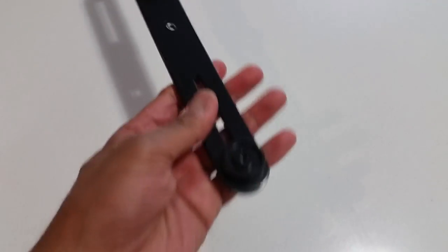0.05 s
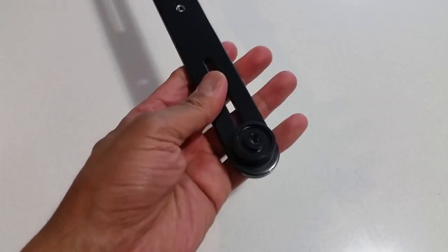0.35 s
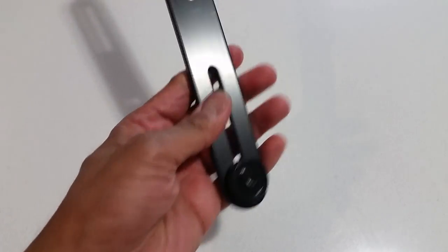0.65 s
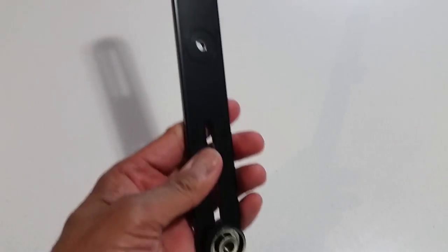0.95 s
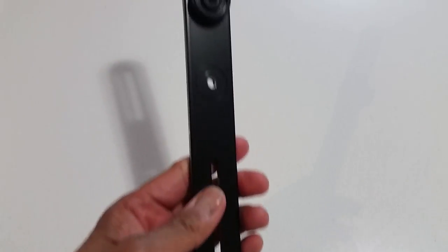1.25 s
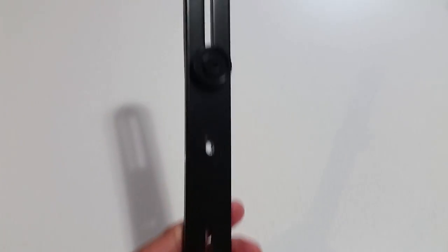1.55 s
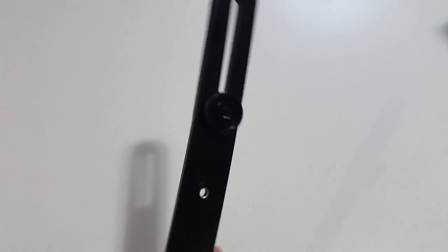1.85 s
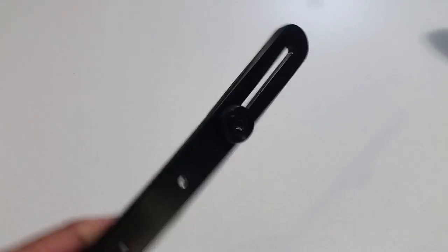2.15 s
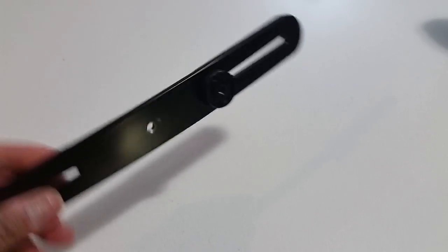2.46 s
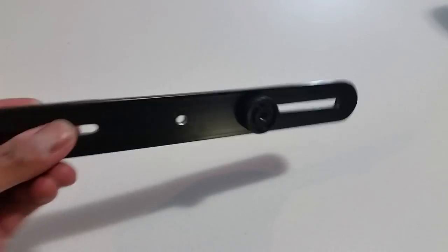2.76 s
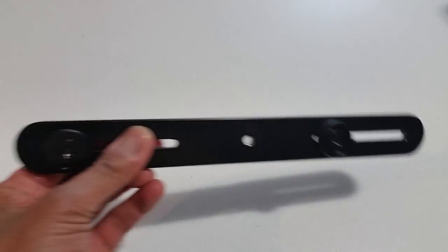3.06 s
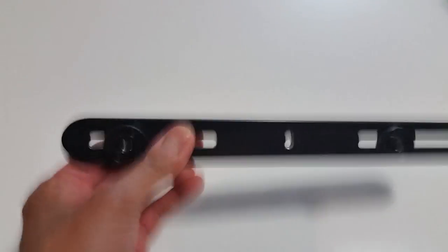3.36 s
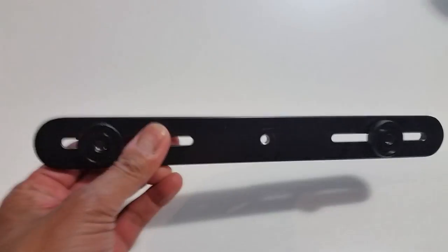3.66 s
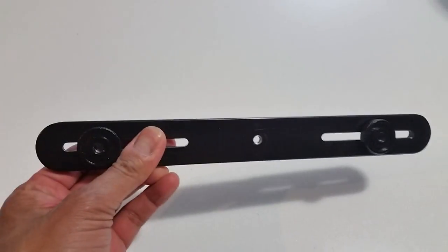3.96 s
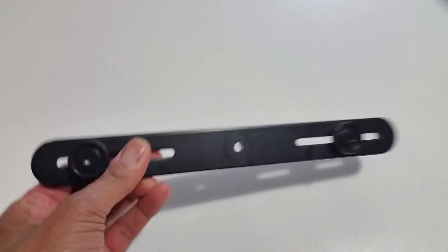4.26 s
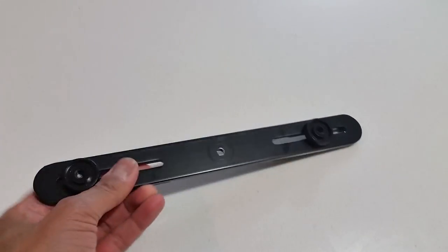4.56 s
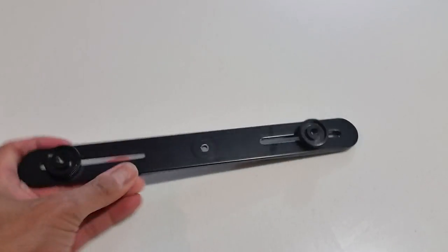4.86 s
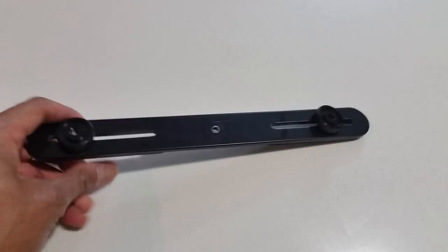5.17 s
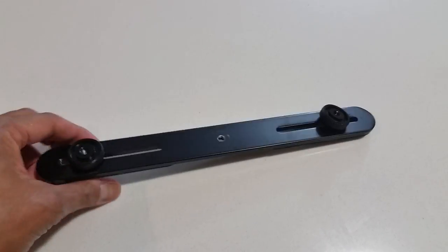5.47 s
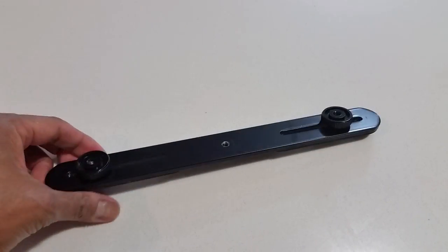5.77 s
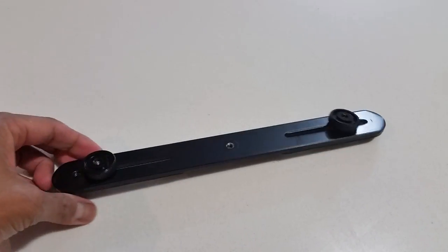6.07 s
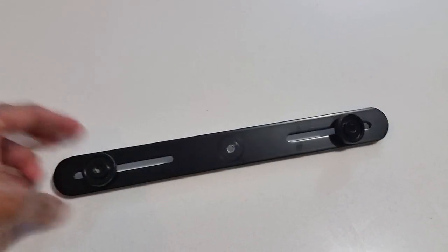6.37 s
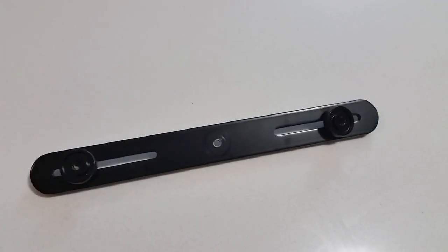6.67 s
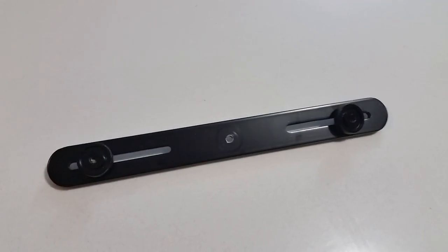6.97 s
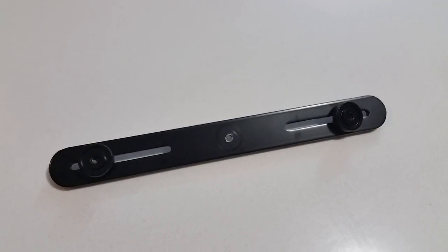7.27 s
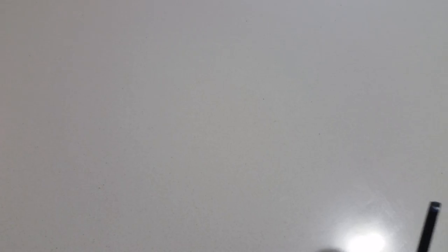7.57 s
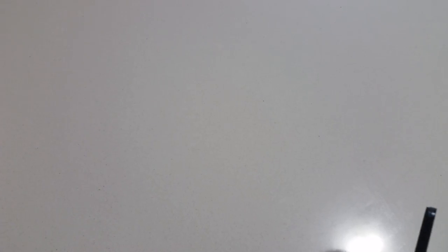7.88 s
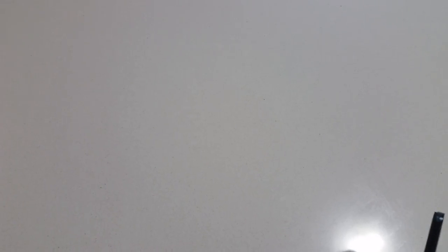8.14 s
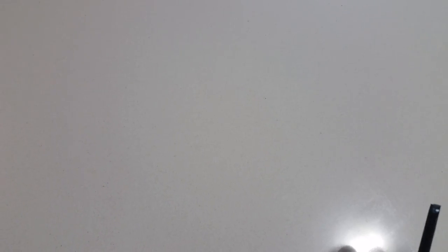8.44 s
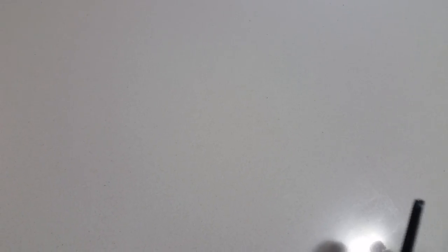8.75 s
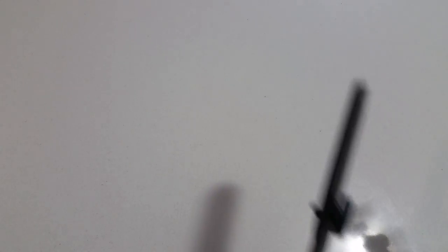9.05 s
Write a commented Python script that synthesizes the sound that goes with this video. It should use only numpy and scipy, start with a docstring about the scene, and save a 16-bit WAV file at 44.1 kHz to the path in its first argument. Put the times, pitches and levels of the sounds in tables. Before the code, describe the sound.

A metal bar is turned by hand, its loose screws clinking, then dragged and laid down with a clatter while an appliance hums.

```python
"""A metal camera bar is turned and laid down

A hand turns a slotted metal bar in a small, hard room. Two loose thumb screws clink and rattle in their slots,
now and then with a thin high ring. The bar drags on a table and clatters down. Skin rubs and bumps on the
metal, once the hand brushes the recording phone, and an appliance hums under everything."""
import sys
import numpy as np
from scipy import signal
from scipy.fft import rfft, irfft
from scipy.io import wavfile
from scipy.ndimage import uniform_filter1d

SR = 44100
rng = np.random.default_rng(int(sys.argv[2]) if len(sys.argv) > 2 else 0)


def file_out(sig):
    """Save sig as 16-bit WAV at sys.argv[1]."""
    # one column per channel
    cols = np.atleast_2d(sig).T
    # limit, then scale
    lim = np.clip(cols, -1, 1)
    pcm = np.round(lim * 32767).astype(np.int16)
    wavfile.write(sys.argv[1], SR, pcm)


N = 401751
TIME = np.arange(N) / SR
RING = TIME[:SR // 3]  # the time axis of one hit
SIDES = np.array([[1], [-1]])  # plus for left, minus for right

# a thumb screw hits its slot: start_s, level_db, treble_db
CLINKS = [(0.0252, -30, 6.5), (0.0742, -27.5, 1), (.782, -71.5, -37), (2.1576, -28.5, -4.5),
          (2.185, -32, -4.5), (2.2107, -25, 5.5), (2.269, -26.5, -2.5), (2.3179, -19, -5),
          (2.468, -28, -10.5), (2.6694, -26.5, -6.5), (2.82, -20.5, 4), (2.83, -26, -1.5),
          (2.8901, -22.5, -6), (2.9319, -17.5, -2), (2.9593, -24, 1.5), (2.988, -20, 2),
          (3.0575, -16.5, -2.5), (3.1301, -16.5, 2), (3.298, -19.5, 5), (4.5037, -32, 8.5),
          (4.514, -19, 14.5), (4.6601, -19, 7), (5.0894, -30.5, -3), (5.104, -31.5, -1), (5.1576, -23, -2),
          (5.1725, -26, 7.5), (5.198, -19, 4.5), (5.58, -29, -13), (5.6187, -38, -15.5),
          (5.658, -33, -19.5), (5.8373, -24.5, -14), (6.2439, -33.5, -7), (6.273, -27.5, -5.5),
          (6.3585, -17.5, 8), (6.3908, -14, -3)]
# the tones a screw rings with: pitch_hz, level_db, ring_s (time to fade by 60 dB)
SCREW_MODES = [(1750, -13, 0.05), (2947, -4, 0.045), (4100, -14.5, 0.013), (4287, -4, 0.041),
               (4384, -22, 0.45), (5150, -15.5, 0.059), (6046, 4, 0.033), (8100, -11, 0.026),
               (7890, -9.5, 0.034), (9670, -4.5, 0.034), (10230, -14.5, 0.035), (12000, -22, 0.27),
               (12900, -21, .015)]
# the contact noise of a screw: pitch_hz, level_db
SCREW_CRACK = [(200, -27.5), (900, -9), (1600, -4), (3700, 3), (6000, 0), (9000, 5.5), (16000, -20.5)]


def screw_clinks(gain_db=-1, graze_db=-21, rebound_db=-14):
    """A loose screw grazes its slot, hits it and bounces back at once."""
    out = np.zeros((2, N))
    for start_s, level_db, treble_db in CLINKS:
        hit = strike(SCREW_MODES, SCREW_CRACK, crack_db=-7, crack_s=0.032, scatter_db=3, detune=0.0054)
        pan_db = -2 + 0.0847 * (level_db + 25)  # on the right, hard hits nearer the middle
        hit = brighten(hit, treble_db) * undb(level_db + gain_db + pan_db * SIDES)
        flight_s = rng.uniform(.002, .006)
        add(out, start_s - flight_s, undb(graze_db) * hit)
        add(out, start_s, hit)
        add(out, start_s + flight_s, undb(rebound_db) * hit)
    return out


def screw_rattles(blows_per_s=400, weaken_db=10, pan_db=-2):
    """A screw skips along its slot in a burst of tiny, weakening blows."""
    # each rattle: start_s, length_s, level_db, treble_db
    bursts = [(0, .06, -30.5, 3), (4.523, .055, -29, 6.5), (5.205, .025, -25, 0.5),
              (6.394, 0.048, -37, -2.5)]
    out = np.zeros((2, N))
    for start_s, length_s, level_db, treble_db in bursts:
        hit = strike(SCREW_MODES, SCREW_CRACK, crack_db=-10, crack_s=0.0088,
                     scatter_db=4.5, detune=0.0033)
        hit = brighten(hit, treble_db)
        size = int(length_s * SR)
        count = int(blows_per_s * length_s) + 1
        blows = np.zeros(size)
        blows[rng.integers(0, size, count)] = rng.standard_normal(count)
        blows *= undb(-weaken_db * np.arange(size) / size)
        burst = signal.fftconvolve(hit, blows[None], axes=1)
        add(out, start_s, undb(level_db + pan_db * SIDES) * burst / burst[:, :size].std())
    return out


def screw_rings(rim_hz=11980, touchdown_s=5.05):
    """A screw's free rim sings; once the bar is on the table, the grip is loose and clinks ring on."""
    # the rim is left free: start_s, level_db
    rim_pings = [(0, -28.5), (2.158, -41.5), (2.317, -31.5), (2.668, -31), (2.819, -26), (4.527, -15),
                 (5.21, -33.5)]
    # tones that ring on in the loose grip: pitch_hz, offset_db (compared with the clink)
    loose_modes = [(3020, -15), (5075, -17), (6090, -11)]
    out = np.zeros((2, N))
    for start_s, level_db in rim_pings:
        add(out, start_s, undb(level_db) * sing(rim_hz, ring_s=0.23, swell_s=0.0035))
    for start_s, level_db, _ in CLINKS:
        if start_s > touchdown_s:
            for pitch_hz, offset_db in loose_modes:
                tone = sing(pitch_hz, ring_s=0.25, swell_s=0.0018)
                add(out, start_s, undb(level_db + offset_db) * tone)
    return out


def bar_knocks(gain_db=-2, bounce_s=0.0092, bounce_db=-3):
    """The bar clacks in the hand, lands on one end, then drops flat; every knock bounces twice."""
    # knocks, mostly against the table: start_s, level_db, tilt_db_per_octave (higher is brighter)
    knocks = [(4.513, -35.5, -7), (4.727, -40.5, -4), (4.860, -45.5, -6), (5.006, -35, -1),
              (5.120, -41, -3.5), (5.155, -34, -1.5), (5.342, -38, 0.5), (5.834, -33.5, -3),
              (6.269, -34, -7), (6.345, -30, -3.5), (6.358, -16, 1), (6.39, -25, 1)]
    # the tones of the whole bar: pitch_hz, level_db, ring_s
    bar_modes = [(228.9, -11, 0.19), (1340, -5, 0.057), (1501.5, -2, 0.077), (2230, -13, 0.064),
                 (2720, -2, 0.071), (3344, -10.5, 0.091), (4010, -13, 0.055), (4365, -7, 0.24),
                 (9403, -13.5, 0.035)]
    # the contact noise of the bar: pitch_hz, level_db
    bar_crack = [(100, -24), (220, 6), (600, -1.5), (1600, 1), (4000, 3.5), (7000, -4), (16000, -33)]
    out = np.zeros((2, N))
    for start_s, level_db, tilt in knocks:
        for bounce in range(3):
            hit = strike(bar_modes, bar_crack, crack_db=4, crack_s=0.041, scatter_db=3, detune=0.0016)
            hit = unit_start(colour(hit, [(500, -2 * tilt), (8000, 2 * tilt)]))
            add(out, start_s + bounce * bounce_s, undb(level_db + gain_db + bounce * bounce_db) * hit)
    return out


def bar_drags():
    """The bar's edge scrapes over the table."""
    # each scrape: start_s, length_s, level_db
    strokes = [(4.85, 0.13, -60.5), (5.0, 0.28, -47.5), (5.83, 0.22, -56), (6.04, 0.22, -55)]
    # the tone colour of the scrape: pitch_hz, level_db
    spectrum = [(200, 3.5), (700, 3.5), (1800, 4), (4300, 2), (7000, -9.5), (16000, -26)]
    return friction(strokes, spectrum, grain=0.9)


def hand_bumps():
    """The hand makes dull thuds, each with a little tick of skin."""
    # each bump: start_s, level_db, pitch_hz, ring_s, tick_db
    bumps = [(3.472, -22, 371, 0.022, -37), (3.644, -61, 400, .02, -52), (4.499, -34, 207.6, 0.1, -38),
             (7.381, -33.5, 170, 0.064, -63.5)]
    tick_colour = [(200, -8.5), (900, -6.0), (2000, 1.5), (16000, -16.5)]  # pitch_hz, level_db
    out = np.zeros(N)
    for start_s, level_db, pitch_hz, ring_s, tick_db in bumps:
        thud = fade(ring_s) * np.sin(2 * np.pi * pitch_hz * RING)
        tick = fade(0.084) * unit(colour(rng.standard_normal(len(RING)), tick_colour))
        add(out, start_s, undb(level_db) * thud + undb(tick_db) * tick)
    return out


def skin_rubs():
    """Skin slides and grips on the metal; once, late, the hand brushes the phone that records."""
    # each rub: start_s, length_s, level_db
    strokes = [(1.85, 0.34, -77.5), (2.08, 0.39, -52.5), (2.46, 0.37, -49), (3.468, 0.0061, -34),
               (3.55, .12, -56), (7.6, .12, -78), (9.02, .09, -65.5)]
    # the tone colour of the rub: pitch_hz, level_db
    spectrum = [(300, 5.5), (1500, 0.5), (4000, 0), (6500, -2.5), (9000, 11.5), (13000, -1.5), (16000, -7)]
    return friction(strokes, spectrum, grain=0.7)


def room(sound, echo_db=0, left_lag_s=0.00019):
    """Bare walls add quick echoes and a tail whose treble dies first."""
    # how long the room rings: pitch_hz, ring_s
    decay = [(200, 0.99), (1000, 0.7), (4500, 0.66), (8000, 0.5), (15000, 0.36)]
    # the share of echo as the bar moves away and down to the table: time_s, level_db
    echo_share = [(0, -9), (2.3, -10.5), (3.3, -12), (5.2, -9), (6.4, -9.5)]
    t = TIME[:SR * 3 // 4]
    band_hz, band_ring_s = np.transpose(decay)
    freq = np.maximum(np.fft.rfftfreq(len(t), 1 / SR), 1)
    noise = rfft(rng.standard_normal((2, len(t))))
    tail = np.zeros((2, len(t)))
    for band, ring_s in zip(np.eye(len(band_hz)), band_ring_s):
        weight = np.interp(np.log(freq), np.log(band_hz), band)
        tail += irfft(noise * weight, len(t)) * fade(ring_s, t)
    early = rng.standard_normal((2, len(t))) * fade(0.083, t)
    echoes = unit(tail * (t > .008)) + undb(-9) * unit(early * (t > .002))
    left, right = np.broadcast_to(sound, (2, N))
    late_left = np.pad(left, (int(left_lag_s * SR), 0))[:N]  # reaches the left microphone later
    direct = np.array([late_left, right])
    to_walls = direct * undb(echo_db + np.interp(TIME, *np.transpose(echo_share)))
    return direct + signal.fftconvolve(to_walls, echoes / np.sqrt(len(t)), axes=1)[:, :N]


def appliance_hum():
    """An appliance hums with a few low tones that waver."""
    # each tone: pitch_hz, level_db, wobble_db
    tones = [(63.2, -17.5, 2), (119.96, 0.5, 1), (239, -22.5, 3.5), (267.2, -20, 1.5)]
    hum = np.zeros(N)
    for pitch_hz, level_db, wobble_db in tones:
        gain = np.sqrt(2) * undb(level_db + wobble_db * wander(7))
        phase = 0.14 * wobble_db * wander(5.4)
        hum += gain * np.sin(2 * np.pi * pitch_hz * TIME + phase)
    return hum


def background(hum_db=-39, air_db=-59, drift_db_per_s=-0.1):
    """Hum, low rumble and air noise slowly get quieter and dip three times; the hiss dips most."""
    # the room's rumble: pitch_hz, level_db
    rumble_colour = [(20, -2.5), (62, 5), (85, -1.5), (145, 3), (290, -1.5), (400, -10.5), (800, -50.5)]
    # the air noise: pitch_hz, level_db
    air_colour = [(180, -33.5), (300, -0.5), (385, -6), (418, -7.5), (546, -8), (774, -9.5), (978, -17),
                  (3950, -36), (6620, -44.5), (16000, -35)]
    drift_db = drift_db_per_s * (TIME - TIME.mean())
    low_change_db = dips(drop_db=6.5, sink_db_per_s=2.5, slowness=0.91) + drift_db + 0.8 * wander(3)
    air_change_db = dips(drop_db=7.5, sink_db_per_s=11.5, slowness=1.15) + drift_db
    low = appliance_hum() + undb(-13) * wide_noise(rumble_colour, width_db=-12)
    air = wide_noise(air_colour, width_db=-4) * undb(air_db + air_change_db)
    hiss = signal.sosfilt(signal.butter(1, 2000, "high", fs=SR, output="sos"), air)
    air += hiss * (undb(air_change_db - 0.06) - 1)  # the hiss takes the change a second time
    return low * undb(hum_db + low_change_db) + air


def dips(drop_db, sink_db_per_s, slowness, fall_s=0.05):
    """The background's change in dB: it drops quickly, sinks steadily, then comes back."""
    # each dip: start_s, length_s, recovery_s (before slowness stretches it)
    quiet_spells = [(0, 0.84, 0.25), (4.49, 0.89, 0.25), (6.348, 0.969, 0.036)]
    change_db = np.zeros(N)
    for start_s, length_s, recovery_s in quiet_spells:
        held_s = np.clip(TIME - start_s, 0, length_s)
        after_s = np.maximum(TIME - start_s - length_s, 0)
        depth_db = drop_db * np.minimum(held_s / fall_s, 1) + sink_db_per_s * held_s
        change_db -= depth_db * np.exp(-after_s / (slowness * recovery_s))
    return change_db


def strike(modes, crack, crack_db, crack_s, scatter_db, detune):
    """One blow on metal: where it lands changes the tones a little, and the faces grate briefly."""
    ring = np.zeros(len(RING))
    for pitch_hz, level_db, ring_s in modes:
        louder, higher, flip = rng.standard_normal(3)
        tone = np.sign(flip) * np.sin(2 * np.pi * pitch_hz * (1 + detune * higher) * RING)
        ring += undb(level_db + scatter_db * louder) * fade(ring_s) * tone
    noise = rng.standard_normal((2, len(RING))) * fade(crack_s)
    grating = np.array([unit_start(colour(side, crack)) for side in noise])
    return unit_start(ring) + undb(crack_db) * grating


def brighten(hit, treble_db):
    """A sharp contact favours the high tones, a soft one the low tones."""
    tilt = [(2900, -0.14 * treble_db), (4300, 0), (6200, 0.074 * treble_db), (8500, treble_db)]
    return unit_start(colour(hit, tilt))


def sing(pitch_hz, ring_s, swell_s):
    """One tone builds up and rings out, reaching each microphone at its own point in the wave."""
    phase = 2 * np.pi * rng.random((2, 1))
    swell = 1 - np.exp(-(RING / swell_s) ** 2)
    return swell * fade(ring_s) * np.sin(2 * np.pi * pitch_hz * RING + phase)


def friction(strokes, spectrum, grain, uneven_db=2):
    """Rubbing is many tiny slips of uneven size; each stroke builds, holds and dies away."""
    slips = rng.standard_normal(N) * np.exp(grain * rng.standard_normal(N))
    pressure = np.zeros(N)
    for start_s, length_s, level_db in strokes:
        build = np.clip((TIME - start_s) / (0.25 * length_s), 0, 1)
        release = fade(0.1 + 1.3 * length_s, np.maximum(TIME - start_s - length_s, 0))
        pressure += undb(level_db) * build * release
    return unit(colour(slips, spectrum)) * pressure * undb(uneven_db * wander(40))


def wide_noise(spectrum, width_db):
    """Steady noise; width_db sets how much left and right differ."""
    middle, side = (unit(colour(rng.standard_normal(N), spectrum)) for _ in range(2))
    return middle + undb(width_db) * SIDES * side


def colour(sound, points, size=8192):
    """Filter a sound along a curve of (pitch_hz, level_db) points."""
    pitch_hz, level_db = np.transpose(points)
    freq = np.maximum(np.fft.rfftfreq(size, 1 / SR), 1)
    gain = undb(np.interp(np.log(freq), np.log(pitch_hz), level_db))
    cepstrum = irfft(np.log(gain))
    cepstrum[1:size // 2] *= 2  # folded forward, so the filter never rings ahead of a hit
    cepstrum[size // 2 + 1:] = 0
    response = irfft(np.exp(rfft(cepstrum)))[:size // 2]
    return signal.oaconvolve(sound, np.array(response, ndmin=sound.ndim), axes=-1)[..., :sound.shape[-1]]


def fade(ring_s, t=RING):
    """Die away by 60 dB in ring_s seconds."""
    return np.exp(-np.log(1000) * t / ring_s)


def wander(rate_hz):
    """A smooth random curve that swings by about 1."""
    step = int(SR / rate_hz)
    stairs = np.repeat(rng.standard_normal(N // step + 1), step)
    return unit(uniform_filter1d(stairs, step)[:N])


def add(track, start_s, sound):
    """Mix a sound into a track."""
    i = max(int(start_s * SR), 0)
    track[..., i:i + sound.shape[-1]] += sound[..., :N - i]


def undb(db):
    """Turn decibels into a gain."""
    return 10 ** (np.asarray(db) / 20)


def unit(sound):
    """Scale to an average strength (rms) of 1."""
    return sound / np.sqrt(np.mean(sound ** 2))


def unit_start(sound):
    """Scale so that the first 4 ms have a strength of 1."""
    return sound / np.sqrt(np.mean(sound[..., :SR // 250] ** 2))


def scene():
    """Metal and hand sounds in the room, over its hum."""
    rubbing = skin_rubs() + bar_drags()
    metal = screw_clinks() + screw_rattles() + bar_knocks()
    return room(metal + rubbing) + room(screw_rings() + hand_bumps(), echo_db=-10.5) + background()


def record(dry, top_hz=16000):
    """Each microphone has its own tone colour; the highest treble is cut."""
    # how the two microphones hear: pitch_hz, left_db, right_db
    mics = [(146, -3.5, 2.5), (300, -3, 0.5), (1080, -5, 1), (2400, -6, 3), (4480, -3.5, 1.5),
            (5420, -11, -2.5), (6570, 3.5, -14.5), (6880, -7.5, -10.5), (7630, -8, 2.5), (8800, -10, -2.5),
            (9800, -9.5, -4), (13200, -7.5, 3), (14800, 1.5, -2.5)]
    heard = np.array([colour(dry[side], np.array(mics)[:, [0, side + 1]]) for side in range(2)])
    return signal.sosfilt(signal.ellip(8, .2, 70, top_hz, fs=SR, output="sos"), heard)


dry = scene()
out = record(dry)
file_out(out)
```